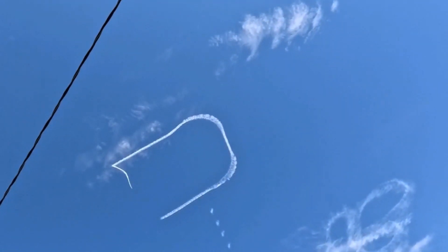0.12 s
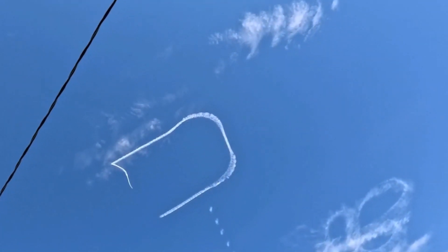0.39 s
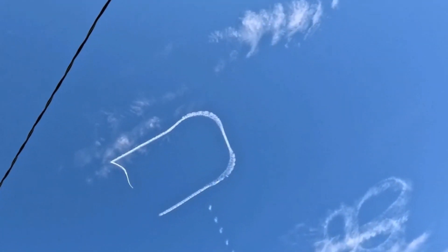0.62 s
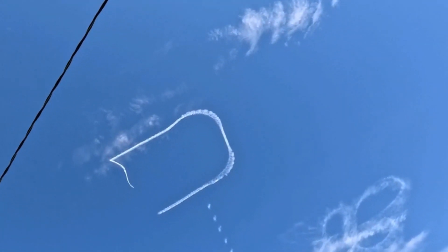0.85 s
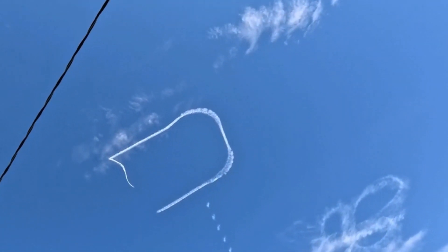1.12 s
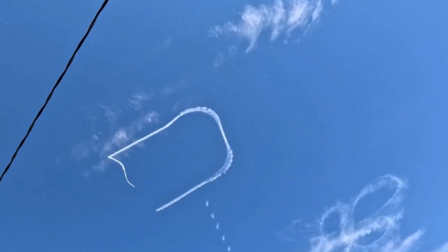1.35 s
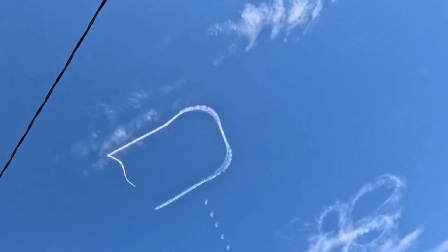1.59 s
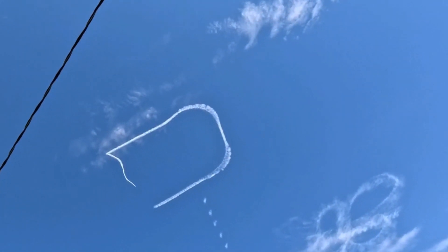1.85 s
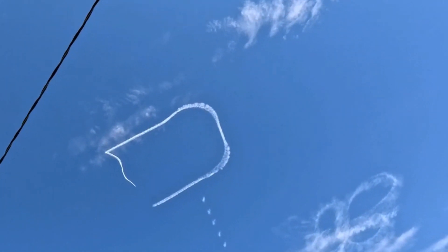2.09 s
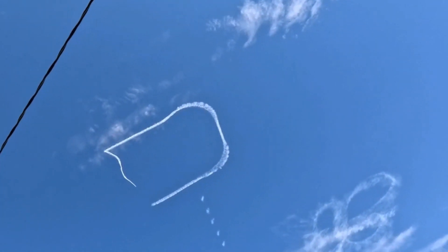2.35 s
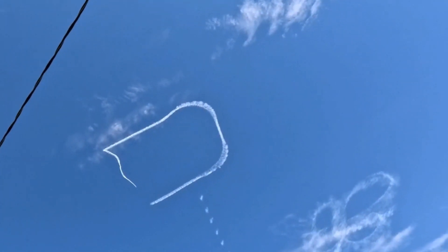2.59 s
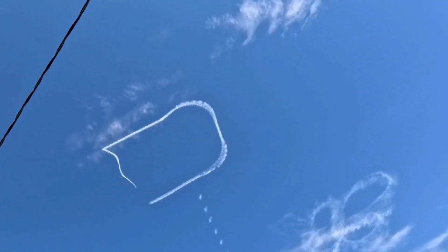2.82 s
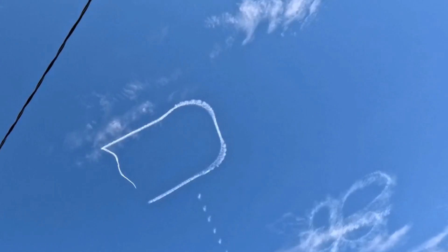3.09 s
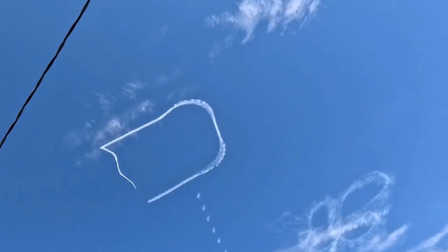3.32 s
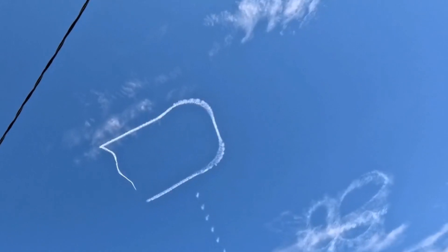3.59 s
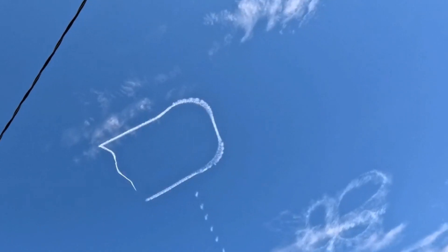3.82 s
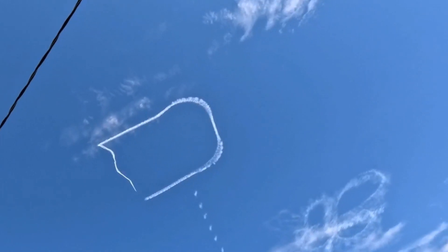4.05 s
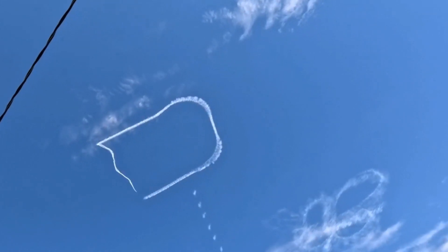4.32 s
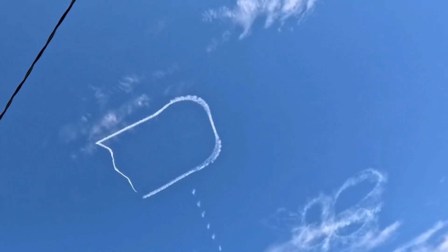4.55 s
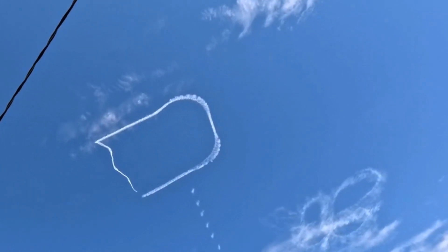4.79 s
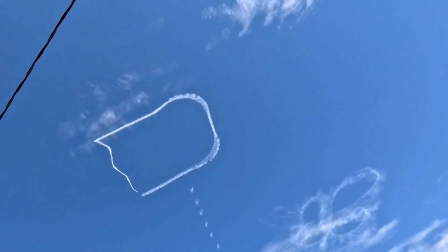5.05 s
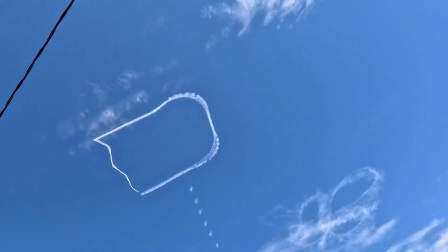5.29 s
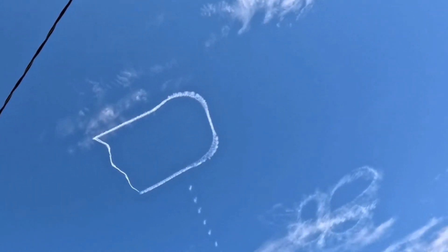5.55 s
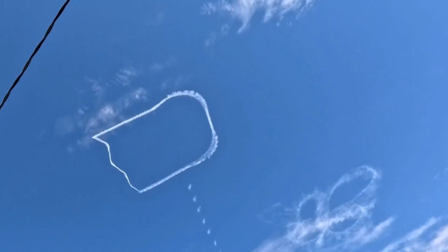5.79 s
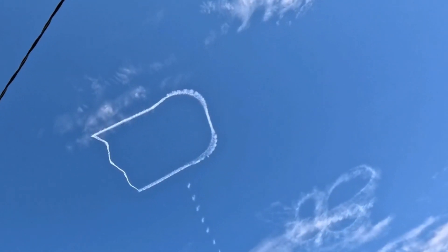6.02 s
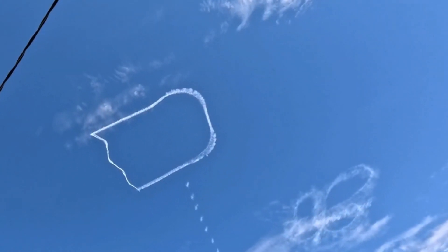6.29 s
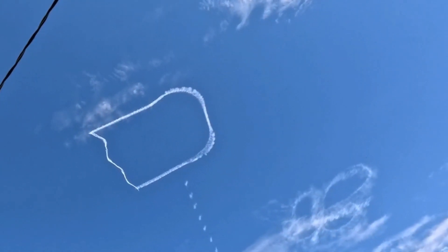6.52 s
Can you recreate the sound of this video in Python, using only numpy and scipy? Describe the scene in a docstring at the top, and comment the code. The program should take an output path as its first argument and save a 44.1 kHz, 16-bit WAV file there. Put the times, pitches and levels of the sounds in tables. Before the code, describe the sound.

A piston propeller plane drones high overhead, swelling and fading, while a nearby cricket chirps evenly and light wind gusts thump the microphone.

```python
"""A piston propeller aircraft drones high overhead, swelling and fading through turbulent air: sines at
engine orders under gated noise. Light gusts thump on the microphone ports: low noise and short pulses.
Crickets chirp in the grass nearby and a higher insect trills without pause: bent sine strokes; faint
treble noise ticks are heard too. Distant insects merge into a chorus of faint strokes and
throbbing noise bands, over banded noise for far traffic, leaves and microphone hiss."""
import sys
import numpy as np
from scipy import signal
from scipy.io import wavfile

SR = 44100
rng = np.random.default_rng(int(sys.argv[2]) if len(sys.argv) > 2 else 0)


def int16_out(signal):
    """Quantize to a 16-bit WAV file."""
    q = np.round(np.clip(np.atleast_2d(signal).T, -1, 1) * 32767)
    wavfile.write(sys.argv[1], SR, q.astype(np.int16))


def rack_gain(trim_db):
    """Turn a fader trim in dB into the linear factor to multiply a signal by."""
    fader = np.asarray(trim_db, float)
    return 10 ** (fader / 20)


N = 293132

# Heard engine speed, dipping as the aircraft banks away.
# Each row: time in seconds, four-stroke cycles per second.
ENGINE_SPEED = [(0, 20.66), (1.3, 20.8), (2.1, 20.44), (3.4, 20.45), (4.2, 20.28), (4.7, 19.87),
                (5.3, 19.98), (5.9, 20.5), (6.65, 20.16)]
# The strongest engine tones, as multiples of the cycle rate: one order per entry.
STRONG_ORDERS = [6, 12, 15, 18, 29]
# Those tones fade in and out. Each row: time in seconds, then the rms level in dB of each strong order.
STRONG_LEVELS = [(0.0, -53.5, -43, -63, -51, -76), (0.13, -48, -43, -58, -50.5, -70),
                 (1.35, -43.5, -36, -55.5, -51.5, -68), (2.0, -44, -41.5, -55, -54, -65.5),
                 (2.37, -45, -42, -70, -68, -79), (2.94, -47.5, -45.5, -62, -58, -82),
                 (3.26, -48.5, -48.5, -53, -54.5, -64.5), (3.59, -33.5, -37, -59, -60, -61),
                 (3.83, -32.5, -31.5, -45, -50, -64.5), (4.22, -32.5, -39.5, -44, -63, -63.5),
                 (4.76, -33, -35.5, -53.5, -55.5, -52), (5.42, -33, -44.5, -46, -65, -60),
                 (5.72, -34.5, -40, -46.5, -75, -63.5), (5.85, -35, -40.5, -45.5, -61, -71),
                 (6.18, -36.5, -40, -47.5, -54.5, -69), (6.29, -36.5, -42, -45.5, -68, -76),
                 (6.55, -42, -52.5, -47, -63, -68.5), (6.65, -58, -47, -65, -72, -65)]
# Higher orders swell with order 12 or with the growl, and shift as the aircraft turns.
# Each row: order, mean rms level in dB, share of order 12's swing, share of the growl's swing [dB per dB],
# trend in dB per second.
UPPER_ORDERS = [(14, -54.5, .9, 0.23, 1.3), (20, -61.5, .4, 0.33, 0.54), (35, -77, .1, 1.62, -0.5)]
# Uneven cylinders fill the orders between. Each row: order, mean peak level in dB.
WEAK_ORDERS = [(4, -61.5), (9, -72), (10, -69.5), (13, -70), (16, -62.5), (17, -67), (19, -74.5), (21, -63),
               (24, -68.5), (25, -70), (26, -65.5), (27, -65), (28, -69), (30, -69), (31, -77), (32, -74.5),
               (33, -79), (34, -71), (36, -87), (39, -76.5), (40, -84), (46, -78)]
# Exhaust and propeller roar. Each row: time in seconds, low growl in dB before an 8 dB cut,
# lower whoosh in dB and its centre in Hz, upper whoosh in dB and its centre in Hz.
ROAR = [(0.0, -59, -71, 1180, -70, 1410), (0.09, -58.5, -64.5, 1050, -71, 1445),
        (0.59, -58.5, -71.5, 1080, -70, 1470), (0.87, -53.5, -59, 942, -72.5, 1490),
        (1.35, -50.5, -65.5, 1060, -62.5, 1496), (1.65, -55, -54.5, 990, -65.5, 1370),
        (2.16, -53.5, -68.5, 1070, -69, 1490), (2.76, -77, -70, 1120, -71.5, 1480),
        (3.42, -56, -56.5, 1010, -64, 1468), (3.57, -57, -53, 983, -57.5, 1398),
        (3.79, -56.5, -61, 1100, -64.5, 1408), (4.24, -57, -70, 1190, -66, 1477),
        (4.42, -58, -57, 919, -67.5, 1610), (4.78, -48, -66.5, 952, -73.5, 1466),
        (4.83, -50, -58, 913, -68, 1784), (4.91, -48.5, -58.5, 955, -67.5, 1410),
        (5.24, -49.5, -68.5, 907, -75, 1550), (5.39, -55, -78, 1050, -67, 1796),
        (5.52, -57.5, -70, 1190, -58.5, 1450), (5.64, -56, -63.5, 1160, -61, 1398),
        (6.29, -73.5, -69, 1080, -72, 1478), (6.65, -61, -65.5, 1170, -69, 1430)]
# Wind on the ports between jolts. Each row: time in seconds, level in dB, left over right in dB.
PORT_WIND = [(0.0, -50, -3), (0.83, -47.5, -4), (1.76, -49.5, -2.5), (2.94, -47, -4.5), (3.13, -44.5, -7.5),
             (4.16, -55, -4), (4.98, -57, -6), (5.57, -39.5, -5), (5.77, -40, -6), (6.65, -50, -2)]
# Pressure jolts on the ports. Each row: time in seconds, peak in dB before the 19 Hz high-pass.
JOLTS = [(.707, -27.5), (.853, -28), (.89, -54), (1.044, -26), (1.455, -33), (3.001, -20.5), (3.102, -25.5),
         (3.198, -28), (3.318, -29), (3.396, -25), (3.582, -24), (5.105, -27), (5.223, -31), (5.32, -28),
         (5.403, -21), (5.448, -17), (5.533, -21), (5.633, -47), (5.733, -28), (6.053, -25), (6.163, -19),
         (6.5, -45)]
# Spectrum of the open air. Each row: frequency in Hz, level in dB per Hz.
AIR_SPECTRUM = [(30, -61), (80, -87.5), (130, -76.5), (200, -79), (330, -78.5), (500, -91), (800, -100),
                (1600, -101), (2500, -105), (3300, -108), (6300, -109), (9000, -113), (13000, -119),
                (16000, -119)]
# How alike the two channels of the air are. Each row: frequency in Hz, likeness from 0 to 1.
AIR_LIKENESS = [(60, 1), (500, 0.9), (1200, 0.39), (2500, 0.47), (6000, 0.23), (10000, 0.71), (13000, .1)]
# Far insect bands. Each row: centre in Hz, width in Hz, level in dB at the height of the swell,
# left over right in dB, throb depth in dB.
FAR_INSECTS = [(4600, 560, -66.5, 0.5, 4.5), (7920, 920, -79.5, -1, 1.5), (9600, 1500, -79, 1, 2),
               (12070, 1200, -84, 19.5, 1.2), (14500, 780, -89, 20, 1)]
# Single strokes of other crickets, between and over the chirps.
# Each row: time in seconds, peak in dB, pitch in Hz, side (1 left, -1 right).
STRAY_STROKES = [(0.018, -55, 4350, 1), (0.389, -56.5, 4320, 1), (0.54, -53.5, 4440, -1),
                 (0.974, -45, 4420, 1), (1.195, -53.5, 4370, 1), (1.367, -46, 4410, 1),
                 (1.863, -54.5, 4240, 1), (2.571, -52, 4260, 1), (2.626, -44, 4480, 1),
                 (2.671, -53.5, 4580, -1), (2.993, -48.5, 4570, -1), (3.125, -51.5, 4420, 1),
                 (3.206, -49, 4370, 1), (3.272, -48.5, 4430, 1), (3.335, -54, 4370, 1),
                 (3.66, -51.5, 4990, 1), (3.74, -57, 4050, 1), (3.767, -45.5, 4270, 1),
                 (3.995, -53, 4500, 1), (4.349, -44, 4370, 1), (4.72, -50, 4330, 1),
                 (4.829, -53.5, 4550, -1), (4.931, -46.5, 4420, 1), (4.99, -51, 4980, 1),
                 (5.495, -43.5, 4390, 1), (5.847, -55.5, 4980, 1), (6.136, -46, 4370, 1)]
# The near cricket on the left, four strokes a chirp. Each row: third stroke's time in seconds,
# chirp level in dB, ms from second to third stroke, ms from third to fourth.
NEAR_CHIRPS = [(.208, -43, 58, 68), (.568, -42, 63, 65), (.952, -41.5, 54, 70), (1.33, -41, 51, 66),
               (1.701, -40, 60, 72), (2.084, -39, 57, 68), (2.464, -39.5, 58, 67), (2.877, -38.5, 61, 63),
               (3.238, -38, 54, 71), (3.607, -38.5, 62, 66), (3.962, -38.5, 58, 66), (4.311, -38, 57, 66),
               (4.686, -38, 55, 66.6), (5.043, -37.5, 60, 64), (5.405, -39, 59, 66), (5.756, -37.5, 59, 65),
               (6.104, -37.5, 55.5, 66.4), (6.469, -36, 57, 66)]
# The four strokes of a near chirp. Each row: level against the chirp in dB, pitch in Hz.
NEAR_STROKES = [(-11.5, 4410), (-3, 4625), (-0.3, 4685), (-0.35, 4633)]
# A farther cricket on the right, two strokes a chirp.
# Each row: second stroke's time in seconds, chirp level in dB.
FAR_CHIRPS = [(.308, -55), (.869, -55), (1.21, -57.5), (1.594, -56.5), (1.941, -54), (2.288, -53),
              (2.615, -52.5), (3.127, -53.5), (3.455, -54), (4.113, -53.5), (4.493, -51.5), (4.84, -54),
              (5.288, -51.5), (5.613, -55.5), (6.023, -52), (6.336, -50), (6.695, -50)]
# The two strokes of a far chirp. Each row: level against the chirp in dB, pitch in Hz.
FAR_STROKES = [(-4, 5030), (0.5, 5140)]
# The trill's wandering tempo. Each row: stroke number, time in seconds.
TRILL_TEMPO = [(0, .069), (39, 2.323), (51, 3.009), (68, 4.014), (89, 5.233), (113, 6.63)]
# Faint treble ticks. Each row: start in seconds, level at the crest in dB.
TICKS = [(0.5596, -64), (1.3269, -64), (1.6901, -64), (2.0253, -63), (2.1355, -65), (2.4668, -63),
         (2.8125, -62), (3.2291, -62), (3.6726, -62), (4.2956, -64), (4.6214, -60.5), (4.7396, -78),
         (5.112, -65), (5.4575, -64.5), (5.684, -62), (6.4572, -63)]


def rms_one(x):
    """Scale to rms 1."""
    return x / np.sqrt(np.mean(x ** 2) + 1e-20)


def in_time(rows):
    """Columns of a curve, one value per sample."""
    s, *columns = np.transpose(rows)
    return [np.interp(np.arange(N) / SR, s, column) for column in columns]


def at_hz(points, hz):
    """Read a spectrum on a log-frequency axis."""
    point_hz, values = np.transpose(points)
    return np.interp(np.log(hz), np.log(point_hz), values)


def drift(rate_hz):
    """Chance wandering of rms 1: coarse noise through a double one-pole low-pass."""
    pole = np.exp(-80 * np.pi * rate_hz / SR)   # one coarse step is 40 samples
    coarse = rng.standard_normal(N // 40 + 2002)
    slow = signal.lfilter([1], [1, -2 * pole, pole * pole], coarse)[2000:]   # settled part
    return np.interp(np.arange(N) / 40, np.arange(len(slow)), rms_one(slow))


def stereo_band(low_hz, high_hz, alike, order=2):
    """Band-passed noise in two channels of a given likeness; unit power per Hz."""
    sos = signal.butter(order, [low_hz, min(high_hz, .45 * SR)], "band", fs=SR, output="sos")
    mid, side = signal.sosfilt(sos, rng.standard_normal((2, N))) * np.sqrt(SR / 4)
    alike = np.clip(alike, 0, 1)
    return np.sqrt(1 + alike) * mid + np.sqrt(1 - alike) * side * [[1], [-1]]


def panned(x, left_db):
    """Tilt towards the left by a level difference."""
    return x * rack_gain(np.multiply.outer([.5, -.5], left_db * np.ones(N)))


def whoosh(centre_hz, width_hz):
    """Noise around a gliding centre: two slow noises ride on its sine and cosine."""
    sos = signal.butter(2, width_hz / 2, fs=SR, output="sos")
    slow = signal.sosfilt(sos, rng.standard_normal(size=(4, N)))
    turn = 2 * np.pi * np.cumsum(centre_hz) / SR
    mid, side = slow[:2] * np.cos(turn) + slow[2:] * np.sin(turn)
    return rms_one(mid + 0.33 * side * [[1], [-1]])


def aircraft():
    """Firing and blade orders as sines on one engine-cycle phase, plus roar gated by the firing cycle."""
    cycles_hz, = in_time(ENGINE_SPEED)
    levels_db = in_time(STRONG_LEVELS)
    growl_db, lower_db, lower_hz, upper_db, upper_hz = in_time(ROAR)
    twelfth_swing = levels_db[1] - np.mean(levels_db[1])
    growl_swing = growl_db - np.mean(growl_db)
    phase = 2 * np.pi * np.cumsum(cycles_hz) / SR
    from_middle_s = (np.arange(N) - N / 2) / SR

    strong = list(zip(STRONG_ORDERS, levels_db))
    for order, db, with_twelfth, with_growl, db_per_s in UPPER_ORDERS:
        swing = with_twelfth * twelfth_swing + with_growl * growl_swing
        strong.append((round(order), db + swing + db_per_s * from_middle_s + 2.42 * drift(1.52)))

    tone = np.zeros(N)
    path = 0.0037 * drift(5.9)   # radians per order, shared by the strong tones
    for order, db in strong:
        # turbulence jitters the path length, so high orders wobble more
        wobble = order * (path + 0.0014 * drift(3.7))
        # the firing orders, multiples of 6, line up into a pulse
        start = rng.uniform(0, 2 * np.pi) * (order % 6 > 0)
        tone += np.sqrt(2) * rack_gain(db + 0.77 * drift(7.8)) * np.cos(order * phase + wobble + start)
    for order, db in WEAK_ORDERS:
        fading_db = db + 0.71 * growl_swing + 3.04 * drift(1.2)
        wobble = .012 * order * drift(4.9)
        tone += rack_gain(fading_db) * np.sin(round(order) * phase + wobble + rng.uniform(0, 2 * np.pi))

    growl = rack_gain(growl_db - 8.0 + 2.5 * drift(13.0)) * rms_one(stereo_band(410, 716, alike=0.78))
    lower = rack_gain(lower_db + 1.5 * drift(6.9)) * whoosh(lower_hz, width_hz=340)
    upper = rack_gain(upper_db + 1.85 * drift(8.6)) * whoosh(upper_hz, width_hz=470)
    gate = 1 + 0.12 * np.sin(phase) + 0.089 * np.sin(2 * phase) + 0.19 * np.sin(6 * phase)
    return tone + panned(gate * (growl + lower + upper), left_db=1.4)


def wind():
    """Lumpy low noise shared by both ports, with sharp pressure jolts and deep buffeting that crests later."""
    jolt_ms, flurry_s = 3.8, 0.038   # half-widths at 1/e; the flurry also crests flurry_s after its jolt
    flurry_db = -12.5   # against the jolt
    level_db, left_db = in_time(PORT_WIND)
    jolts, flurry, t = np.zeros(N), np.zeros(N), np.arange(N) / SR
    for s, db in JOLTS:
        jolts += rack_gain(db) * np.exp(-((t - s) / (jolt_ms / 1000)) ** 2)
        flurry += rack_gain(db + flurry_db) * np.exp(-((t - s) / flurry_s - 1) ** 2)
    lumps = rms_one(stereo_band(5.35, 81, alike=0.96, order=3)) * rack_gain(level_db + 2.4 * drift(8.4))
    buffets = rms_one(stereo_band(12.6, 56, alike=1.0)) * flurry
    jolts = signal.sosfilt(signal.butter(2, 19, "high", fs=SR, output="sos"), jolts)
    return panned(lumps + buffets + jolts, left_db + .5 * drift(3.0))


def air():
    """Far traffic, leaves and microphone hiss in half-octave bands; the treble flickers least."""
    edges = 30 * 2 ** np.arange(0, 9.6, .5)
    out = 0
    for low, high in zip(edges, edges[1:]):
        hz = np.sqrt(low * high)
        flicker_db = 1.8 if hz < 3000 else .5
        gain = rack_gain(at_hz(AIR_SPECTRUM, hz) + flicker_db * drift(5.9))
        out = out + gain * stereo_band(low, high, at_hz(AIR_LIKENESS, hz))
    return panned(out, left_db=2.3)


def stroke(strokes, lead_us, left_db, squeeze, bend):
    """Wing strokes: a near sine that arches up and slides down; weak strokes are shorter and flatter."""
    # quick attack under a rounded swell, in ms for a full-length stroke
    start_ms, attack_ms, crest_ms, half_ms, roundness = -23.5, 11, -1.2, 21.9, 1.97
    # pitch arch over the top: place in ms, rise and sag per ms squared as fractions of pitch before bend
    arch_ms, arch_rise, sag_per_ms2 = -5.5, 0.0116, 0.0002685
    out = np.zeros((2, N))
    chance = rng.standard_normal(size=(len(strokes), 3))
    around = np.arange(-1100, 1100)   # samples about the stroke's time
    loudest_db = np.max(np.array(strokes)[:, 1])
    for (s, db, hz), (a, b, c) in zip(strokes, chance):
        effort = np.clip(1 + squeeze * (db - loudest_db), .4, 1)
        along_ms = around / (SR / 1000) / (effort * (1 + .09 * a))
        arch = np.maximum(arch_rise - sag_per_ms2 * (along_ms - arch_ms) ** 2, -.3)
        pitch = hz * (1 + bend * effort * (1 + .1 * c) * arch)
        phase = 2 * np.pi * (np.cumsum(pitch) / SR + b)
        lead = np.pi * pitch * lead_us * 1e-6 * [[1], [-1]]   # left port ahead when positive
        attack = np.clip((along_ms - start_ms) / attack_ms, 0, 1)
        swell = np.cos(np.pi / 2 * np.clip((along_ms - crest_ms) / half_ms, -1, 1)) ** roundness
        wave = rack_gain(db) * attack * swell * np.sin(phase + lead)
        at = round(s * SR) + around
        inside = (at >= 0) & (at < N)
        out[:, at[inside]] += wave[:, inside]
    # uneven teeth on the file make the level flutter
    return panned(out * rack_gain(2.0 * drift(180.0)), left_db)


def chorus(count=90):
    """Distant crickets overlap as faint random strokes; farther insects blur into throbbing bands."""
    swell_db, peak_s, span_s = 2.5, 4.2, 3.4   # bands fall by swell_db at span_s from the peak
    out = 0
    for lead_us in (50, -20):
        draws = rng.random(size=(count, 3))
        strokes = [(a * N / SR, -60 - 7 * b, 4250 + 800 * c) for a, b, c in draws]
        out = out + stroke(strokes, lead_us, left_db=1, squeeze=0.0069, bend=0.734)
    slow_db = -swell_db * ((np.arange(N) / SR - peak_s) / span_s) ** 2
    for hz, width, db, left_db, throb_db in FAR_INSECTS:
        band = rms_one(stereo_band(hz - width / 2, hz + width / 2, alike=0.66))
        out = out + panned(rack_gain(db + slow_db + throb_db * drift(12.4)) * band, left_db)
    return out


def chirp(s, db, offsets_ms, strokes):
    """The strokes of one chirp as (s, dB, Hz), none quite alike."""
    chance = rng.standard_normal(size=(len(strokes), 2))
    return [(s + ms / 1000, db + step_db + 1.1 * a, hz + 22 * b)
            for ms, (step_db, hz), (a, b) in zip(offsets_ms, strokes, chance)]


def crickets():
    """Near chirps reach one port before the other, with a few soft echoes off ground and walls."""
    pickup_ms, far_gap_ms = 39, 60   # soft first near stroke before the second; between far strokes
    left = [row[:3] for row in STRAY_STROKES if row[3] > 0]
    right = [row[:3] for row in STRAY_STROKES if row[3] < 0]
    for s, db, before_ms, after_ms in NEAR_CHIRPS:
        left += chirp(s, db, [-before_ms - pickup_ms, -before_ms, 0, after_ms], NEAR_STROKES)
    for s, db in FAR_CHIRPS:
        right += chirp(s, db, [-far_gap_ms, 0], FAR_STROKES)
    direct = (stroke(left, lead_us=59, left_db=-0.4, squeeze=0.02036, bend=1.056)
              + stroke(right, lead_us=-30, left_db=-2.0, squeeze=0.0257, bend=1.11))
    out = direct.copy()
    for delay_s, db in [(.009, -12.5), (.023, -17), (.047, -29)]:
        lag = round(delay_s * SR)
        out[:, lag:] += rack_gain(db) * direct[:, :-lag]
    return out


def triller():
    """An unbroken train of faint high strokes, nearly even in time, level and pitch."""
    number, s = np.transpose(TRILL_TEMPO)
    times = np.interp(np.arange(number[-1] + 1), number, s)
    chance = rng.standard_normal(size=(len(times), 3))
    strokes = [(s + .002 * a, -73.5 + 1.6 * b, 7920 + 60 * c) for s, (a, b, c) in zip(times, chance)]
    return stroke(strokes, lead_us=8.1, left_db=4.0, squeeze=0.0088, bend=0.544)


def ticks():
    """Each tick is a short puff of treble noise."""
    puff_ms = 4.5   # from start to crest, and half-width at 1/e
    t = np.arange(N) / SR
    puffs = sum(rack_gain(db) * np.exp(-((t - s) * 1000 / puff_ms - 1) ** 2) for s, db in TICKS)
    return panned(puffs * rms_one(stereo_band(5040, 8300, alike=0.31)), left_db=0.0)


def scene():
    """All sources add up in the open air."""
    return aircraft() + wind() + air() + chorus() + crickets() + triller() + ticks()


def top_cut(x):
    """Nothing passes above the cut-off."""
    return signal.sosfilt(signal.butter(12, 15620, fs=SR, output="sos"), x)


def record(dry):
    """Deliver the finished stereo mix."""
    return top_cut(dry)


dry = scene()
out = record(dry)
int16_out(out)
```